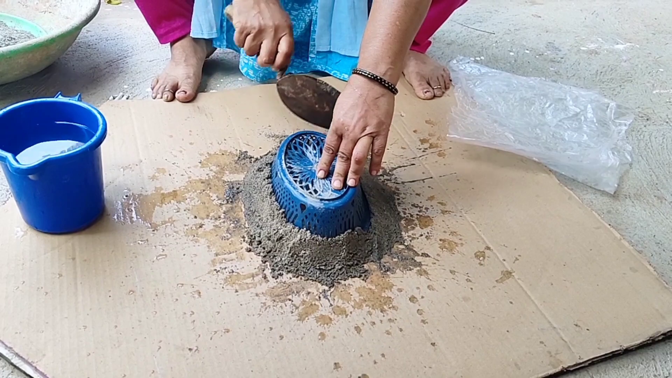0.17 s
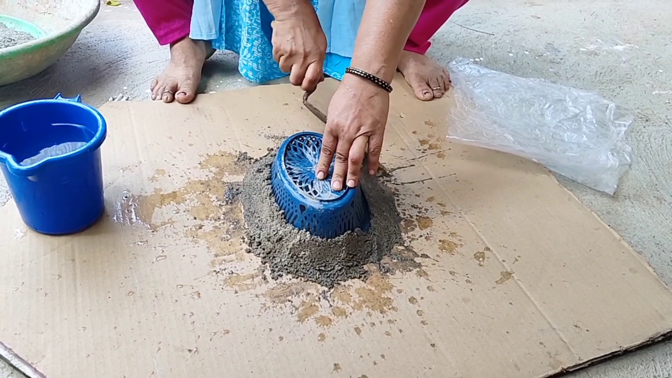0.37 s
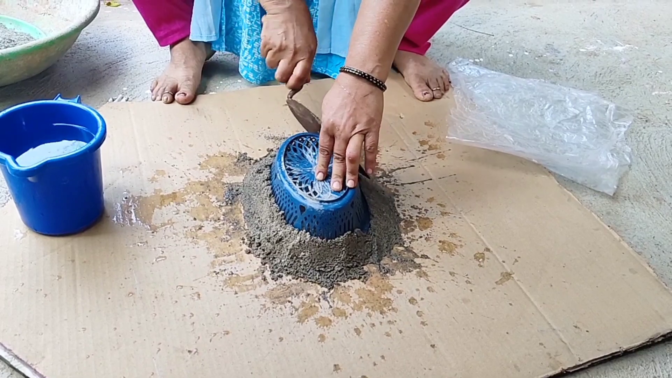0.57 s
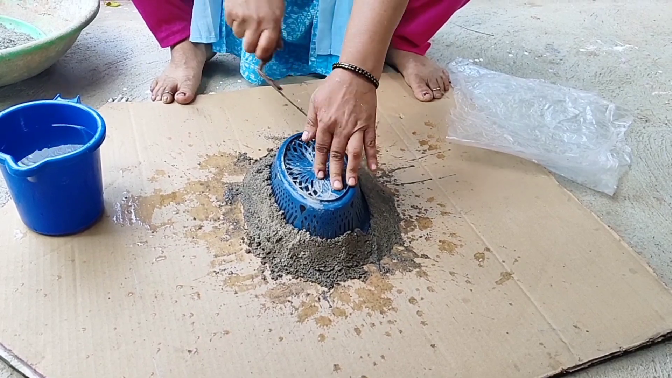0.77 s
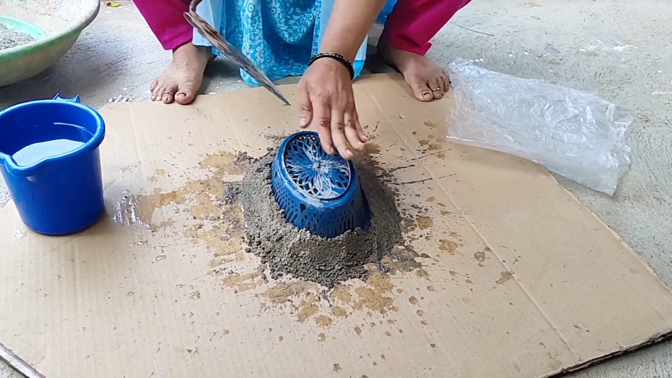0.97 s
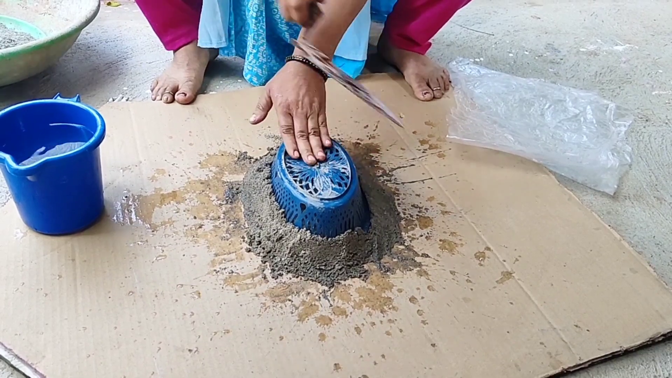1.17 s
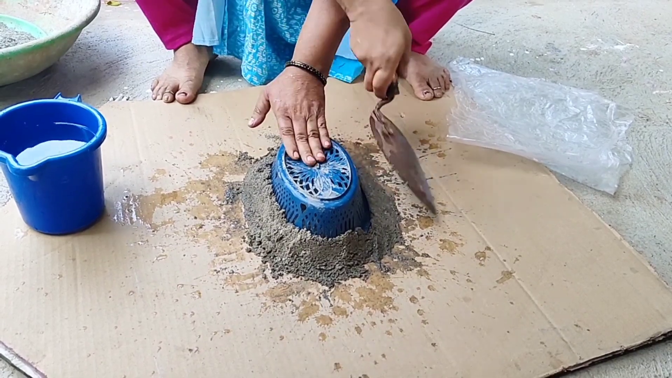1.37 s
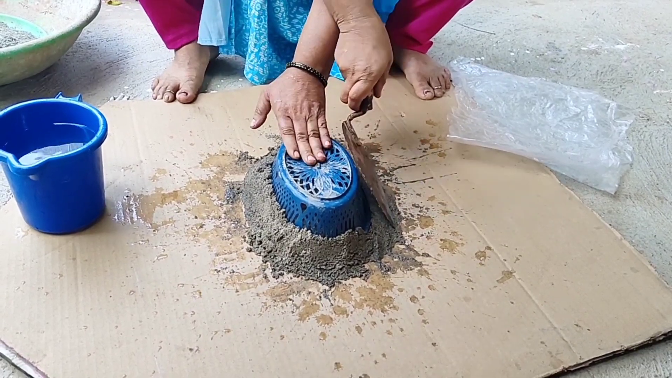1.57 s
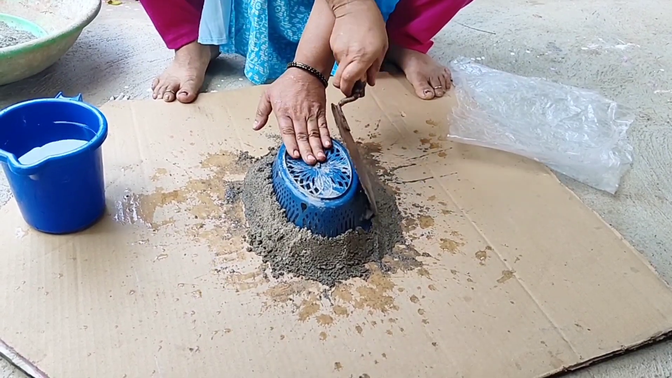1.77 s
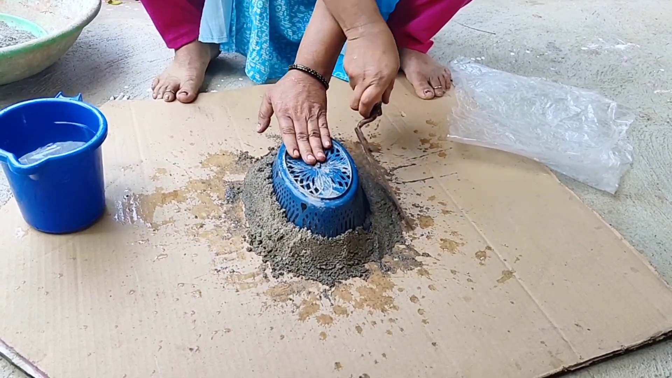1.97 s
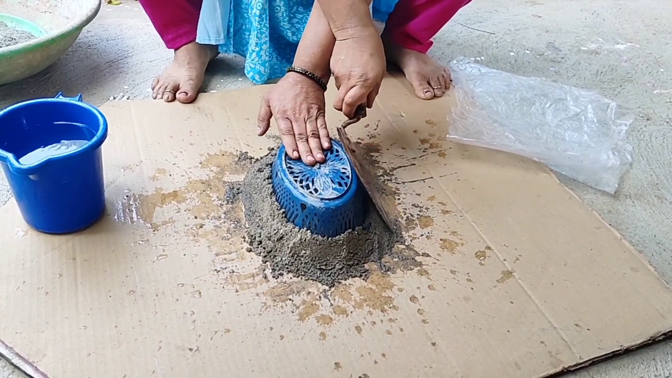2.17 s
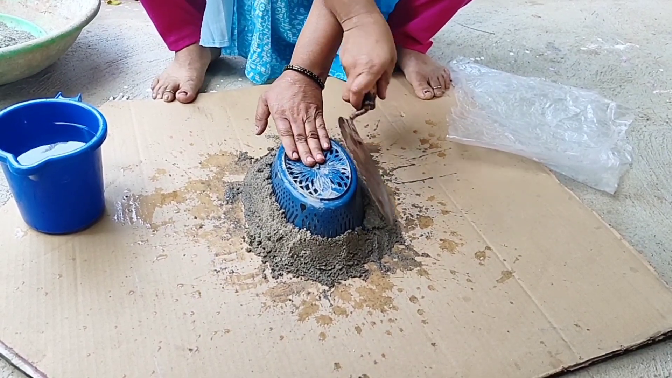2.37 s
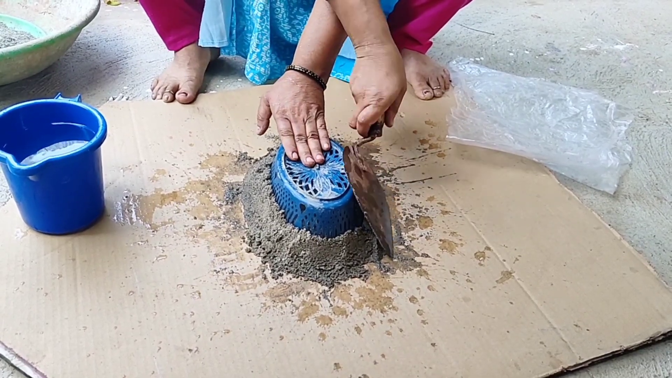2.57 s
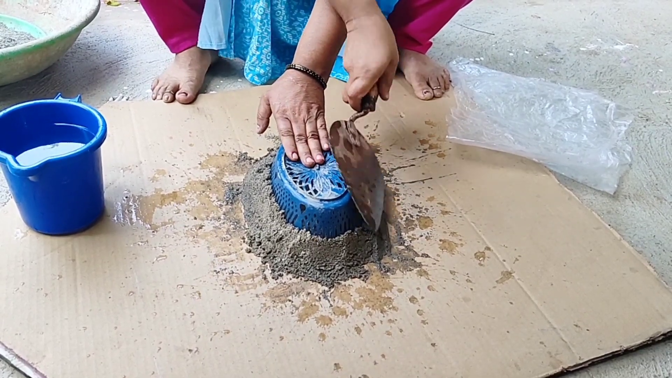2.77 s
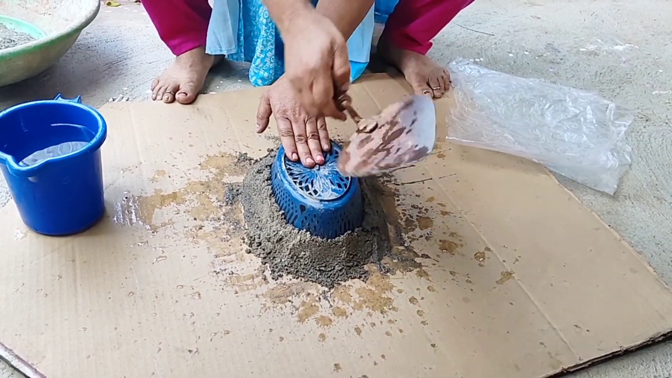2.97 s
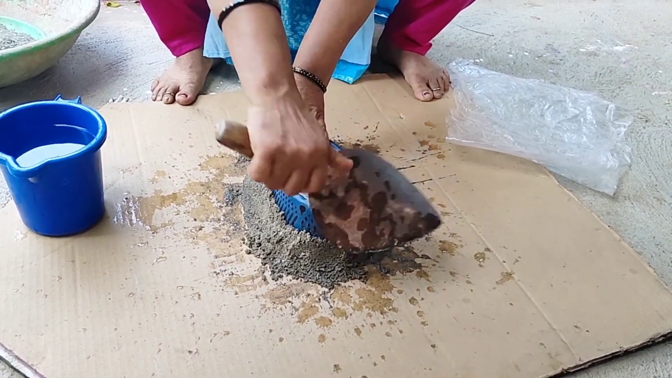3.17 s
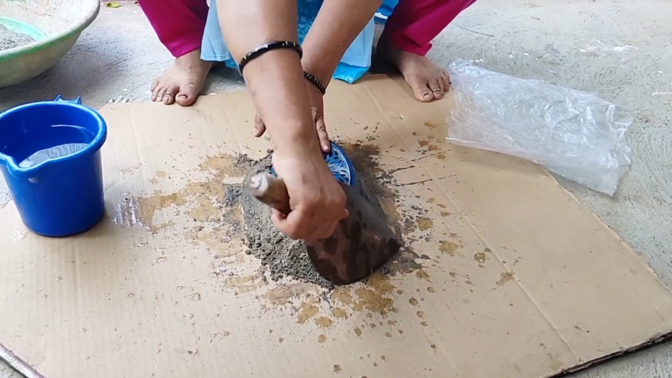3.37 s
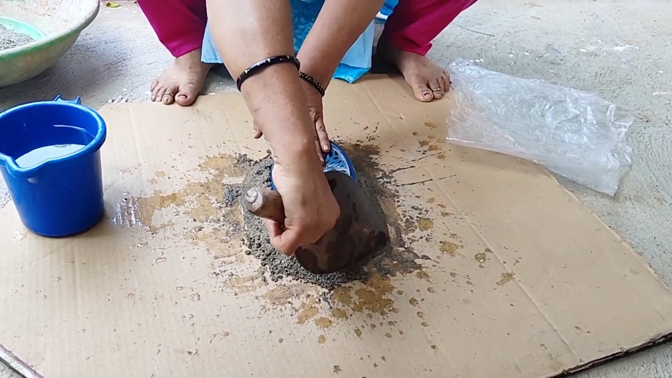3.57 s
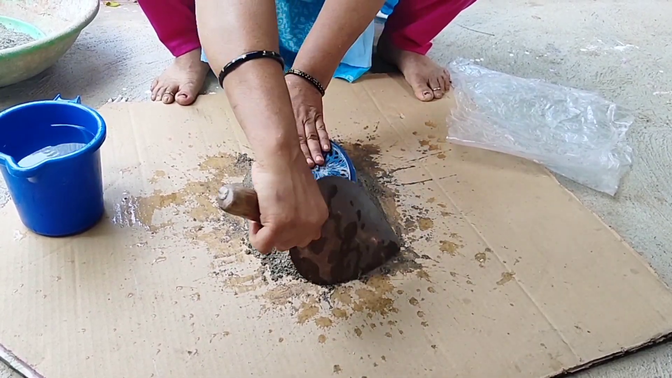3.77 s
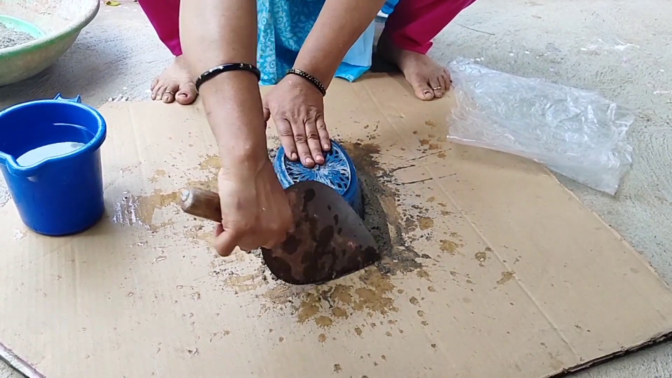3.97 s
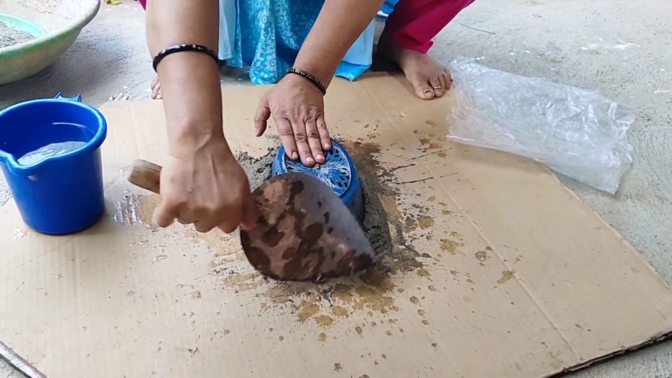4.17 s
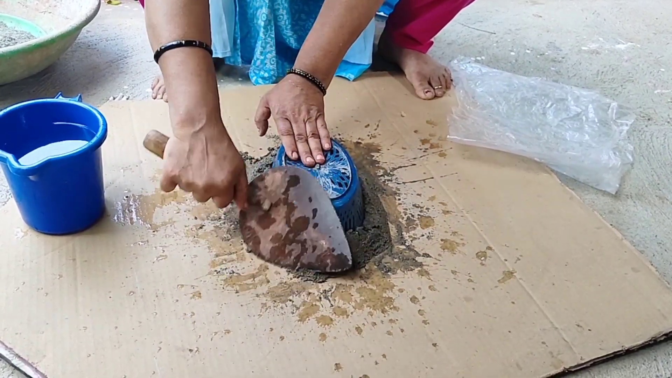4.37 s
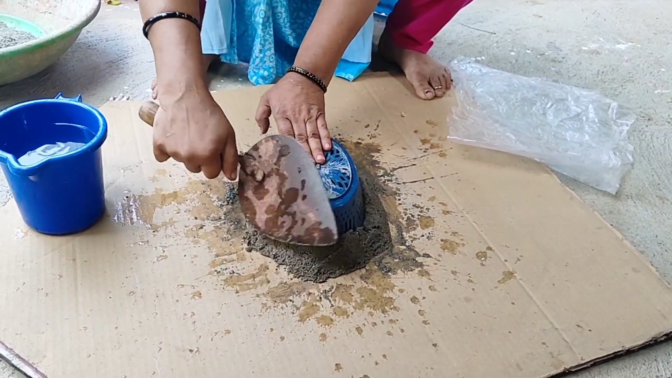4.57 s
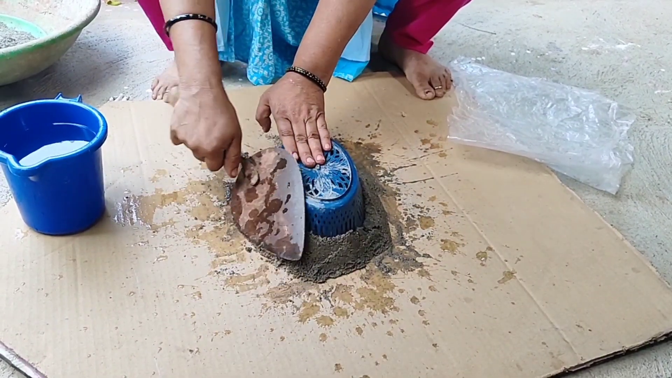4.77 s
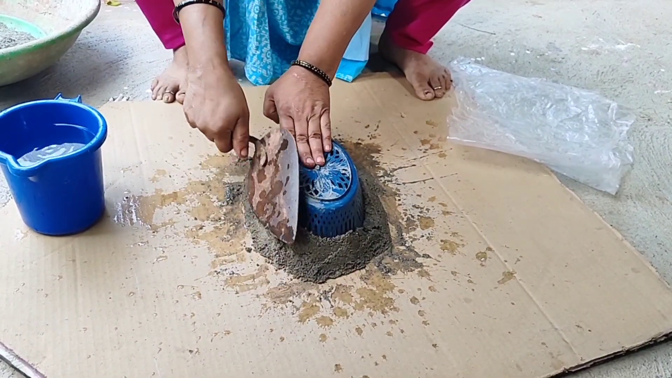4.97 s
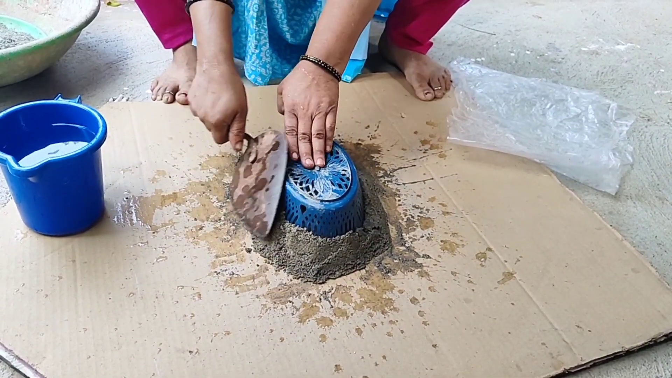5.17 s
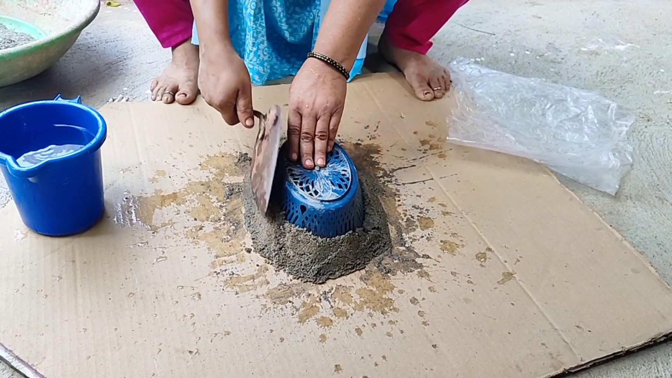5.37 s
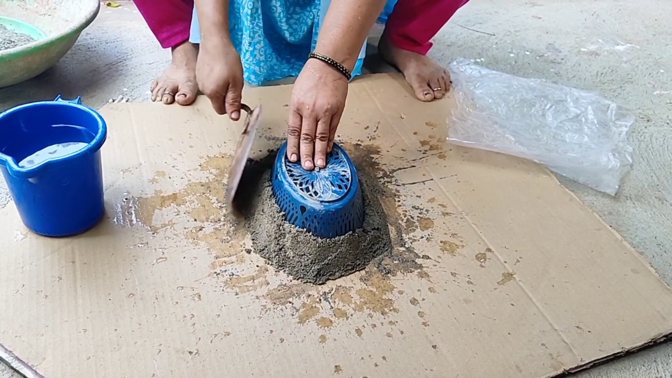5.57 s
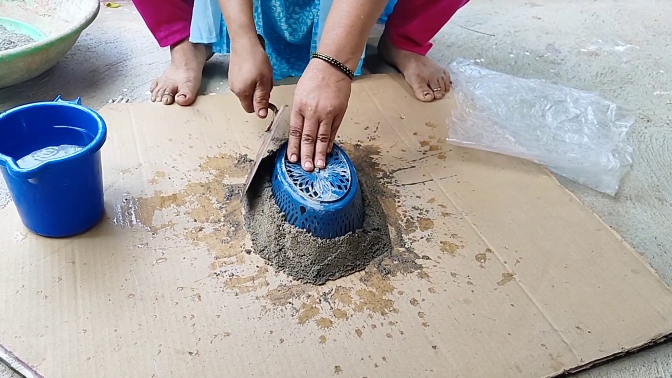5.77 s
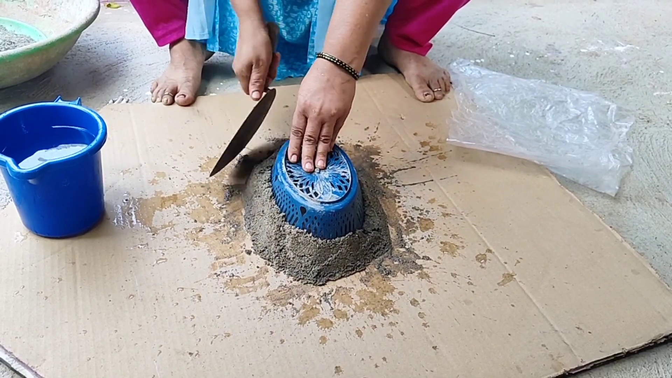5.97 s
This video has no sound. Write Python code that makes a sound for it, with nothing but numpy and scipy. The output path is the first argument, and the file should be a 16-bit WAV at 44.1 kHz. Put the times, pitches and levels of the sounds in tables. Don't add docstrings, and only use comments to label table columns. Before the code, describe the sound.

A quiet outdoor yard, heard about a metre from the work, with low distant traffic rumble swelling gently and a thin airy hum throughout. A steel trowel starts with a very soft gritty drag, then a fuller hollow press at 0.4 seconds fades into a scrape and tiny ping by 0.65. Small ticks and brushes fall near 0.9, 1.2 and 1.3. A short stroke lands at 1.6, a knocking crunch at 2.0, and a strong, dense crunch at 2.55, each followed by a lighter drag. A lull near 3.1 holds only a faint brush and tick. Strokes resume at 3.5, with a heavy gritty knock at 3.9 and a strong double press at 4.35 to 4.45. Shorter hollow, sandy pats follow at 4.8, 5.2 and 5.65, with faint steel pings as the blade lifts. Reflections are brief; the treble is soft.

```python
import sys
import numpy as np
from scipy import signal
from scipy.fft import rfft, irfft, next_fast_len
from scipy.io import wavfile
from scipy.ndimage import uniform_filter1d

SR = 44100
rng = np.random.default_rng(int(sys.argv[2]) if len(sys.argv) > 2 else 0)


def boost(x):
    u = np.asarray(x, float) / 20
    return 10 ** u


def wav_out(sig):
    wavfile.write(sys.argv[1], SR, np.round(np.clip(np.atleast_2d(sig).T, -1, 1) * 32767).astype(np.int16))


N = 265790
T = np.arange(N) / SR
HZ = np.fft.rfftfreq(next_fast_len(N + 8192), 1 / SR)
STEP = 16
TOP_HZ = 15750

# (frequency [Hz], density [dB per Hz])
RUMBLE_SPECTRUM = [(35, -35), (60, -10), (92, -8.5), (129, -13.5), (162, -16), (220, -19), (264, -15.5),
                   (316, -16), (520, -40), (680, -55), (1140, -120)]
HUM_SPECTRUM = [(420, -19), (480, -10.5), (563, -17), (700, -12), (910, -8.5), (1450, 0.5), (1650, -3),
                (2500, -9.5), (3000, -5), (3800, -4.5), (4500, -8.5), (5000, -27.5), (6300, -35),
                (6900, -46)]
# (time [s], level above mean [dB])
SURGES = [
    (.45, 7),
    (.95, 6.5),
    (1.29, 5),
    (1.78, 4.5),
    (3.3, 3),
    (4.8, 3),
    (5.55, 5),
]
RUMBLE_DB, DEEP_DB, SURGE_S = -64.5, -64, 0.082
HUM_DB, HUM_LOW_DB, HUM_HIGH_DB = -64, 0.5, -4
BREEZE_S, BREEZE_DB, BREEZE_LENGTH_S = 3.21, 6, 0.12

# (time [s], mould hollow [dB], board [dB], grit [dB], fine sand [dB])
STROKES = [(0., -9, -15, -0.5, -12), (.41, 7.5, -5.5, -1, -14), (1.57, 1, -25, -2, -10),
           (2.01, 0.5, -11.5, 0.5, -10), (2.54, -5, -25.5, -3, -12.5), (3.47, -5.5, -23, 2, -9.5),
           (3.92, -2.5, -1.5, 5.5, -4.5), (4.34, -5, -8, -4.5, -14), (4.78, 3.5, -11, -1, -9),
           (5.19, 6.5, -3.5, 2.5, -7), (5.64, 2, -5.5, 1, -6.5)]
FLEX_DB = [1, 3, 7, 9.5, -8, 15, 2.5, -11, 4, 2.5, 6]
# (centre [Hz], level [dB])
PACKED = [(880, 5), (690, 9), (694, -1), (730, 8.5), (1300, 1.5), (1000, 0.5), (940, 6), (880, 1),
          (846, -9), (915, 3), (836, -9)]
PACKED_RATIO = 1.243
# (time [s], pressure [dB], attack [s], hold [s], easing [dB/s])
PRESSES = [(0, -56, 0.00067, 0.035, 280), (0.411, -32.5, 0.024, 0.033, 233),
           (1.568, -42, 0.001, 0.0063, 203), (1.686, -57, 0.022, 0.012, 250),
           (2.02, -38, 0.021, 0.051, 141), (2.24, -59, 0.022, 0.018, 178),
           (2.548, -28.5, 0.018, 0.0045, 313), (2.608, -39, 0.034, 0.017, 200),
           (2.799, -56, 0.026, 0.0056, 394), (3.475, -45, 0.0052, 0.022, 190),
           (3.56, -52.5, 0.015, 0.095, 500), (3.924, -39, 0.002, 0.01, 134),
           (3.975, -63, 0.015, 0.0047, 216), (4.345, -34.5, 0.005, 0.053, 201),
           (4.388, -34, 0.034, .012, 326), (4.455, -54, 0.0089, 0.016, 197),
           (4.789, -43.5, .002, 0.018, 165), (4.844, -47, 0.013, .01, 253),
           (5.197, -45.5, .003, 0.051, 200), (5.23, -43, 0.022, 0.012, 240),
           (5.643, -43.5, 0.0041, 0.034, 201), (5.812, -54.5, 0.032, .005, 404)]
# (time of fastest slide [s], grit [dB], swell [s], hold [s], blade ring [dB re grit])
DRAGS = [(0.122, -56, 0.16, 0.024, -17), (0.637, -55, 0.19, 0.025, -25), (1.763, -52, 0.14, 0.042, -8),
         (2.286, -54, 0.1, .04, -20), (2.741, -54.5, 0.24, .03, -18), (3.64, -48, 0.11, 0.045, -24),
         (4.086, -80, .12, 0.022, -24), (4.53, -48.5, 0.27, 0.017, -29), (4.984, -57.5, 0.29, 0.033, -8),
         (5.394, -51.5, 0.1, .025, -20), (5.862, -55, 0.07, 0.014, -1)]
# (time [s], grit [dB], fading [dB/s])
BRUSHES = [
    (0.919, -61.5, 450),
    (1.195, -64.5, 300),
    (1.321, -62.5, 350),
    (3.058, -65.5, 300),
]
# (time [s], peak [dB], treble share [dB], bass share [dB])
KNOCKS = [(0.422, -33, -7, -28), (1.574, -29.5, -38, -14), (1.713, -38, -11, -20), (1.789, -32, -2.5, -22),
          (4.806, -25, -10, -36), (2.019, -20.5, -24, -18), (2.042, -22.5, -10, -30),
          (2.058, -15.5, -7, -33), (2.553, -13, -17, -46), (2.562, -18, -5, -39), (2.659, -50, -5, -26),
          (3.489, -31.5, 1.5, -36), (3.585, -33.5, -10, -30), (3.925, -14.5, -11, -10),
          (4.001, -23, -1.5, -8), (4.346, -15.5, -11.5, -5), (4.375, -29, -7, -25),
          (4.431, -13.5, -9.5, -38), (4.79, -12.5, -11.5, -47), (4.864, -27.5, -7, -37),
          (5.2, -20.5, -9.5, -23), (5.27, -24.5, 3, -24), (5.651, -26.5, 2.5, -30), (5.709, -42, 8.5, -28)]
# (time [s], peak [dB])
PINGS = [
    (0.6294, -45),
    (1.7863, -42),
    (2.3094, -54),
    (2.8294, -50.5),
    (4.9894, -49),
    (5.0294, -46.5),
    (5.4094, -41.5),
    (5.4394, -44),
    (5.8406, -63),
    (5.8794, -50.5),
]
# (time [s], peak [dB], centre [Hz], bright edge [dB])
TICKS = [
    (0.365, -57, 1520, -4),
    (0.925, -37, 3850, -19),
    (0.938, -47, 1400, -22),
    (1.203, -44, 3330, -14.5),
    (1.324, -33.5, 1300, -22),
    (1.349, -57, 1280, -36),
    (3.06, -40, 4230, -18),
    (3.07, -42, 470, -40),
]

# (frequency [Hz], level [dB], T60 [s])
BOARD_MODES = [(186, -11.5, 0.063), (302.5, 5, 0.039)]
MOULD_MODES = [(526, -6.5, 0.1), (629.7, 6, 0.072), (734, -3.5, 0.071), (883, -4, 0.047)]
HEAP_MODES = [(807, 2.5, 0.036), (923, 0.5, 0.035), (1096, -4.5, 0.024), (1102, -3.5, 0.1),
              (1320, -6.5, 0.0073), (1434, -5.5, 0.024)]
BLADE_MODES = [(1572, -5, .25), (1785, -3, .25), (2200, -1, .22), (2400, -8, .2), (2950, -4, .2),
               (3230, -8, .15), (3480, -5, .2), (3660, 0, .3), (3920, -6, .18), (4290, -8, .15),
               (4800, -9, .15), (5500, -5, .2)]

# (frequency [Hz], gain [dB])
LEFT_PORT = [(500, -1), (1800, 2.5), (2500, -0.5), (3300, 1), (3800, 1), (4600, -7), (6300, -9.5),
             (7300, -15), (8300, -11), (10100, -12.5), (10600, -20.5), (12700, -25.5), (14200, -17),
             (15400, -13)]
RIGHT_PORT = [(500, -1), (1400, 5), (1600, 1.5), (2700, 2), (3000, 7.5), (4550, 6.5), (5050, -5),
              (6200, -6.5), (7200, -23), (9000, -30.5), (11000, -15.5), (13000, -23.5), (15000, -42),
              (15900, -43)]

TOUCH_CURVE, SWELL_CURVE = 2.3, 2.1
GRIT_EASE, FINE_EASE, BOARD_EASE = 0.89, 1, 1
PRESS_RING_DB, PRESS_RING_EASE = -14, 1.3
DRAG_LOAD_DB, DRAG_HOLLOW_DB, DRAG_FINE_DB = -9, -26, -7.5
DRAG_OFF_DB_S, FINE_OFF_DB_S = 312, 380
LIFT_DB_S = 247
BRUSH_ATTACK_S, BRUSH_LOAD_DB, BRUSH_FINE_DB, BRUSH_RING_DB = 0.0027, -2, -18, -17
GROUND_T60_S, GROUND_DB = 0.025, 5
YARD_T60_S, YARD_DB = 0.2, 0


def unit(x):
    return x / np.sqrt(np.mean(x ** 2))


def band(x, lo_hz, hi_hz, order=2):
    edges_hz = [lo_hz, min(hi_hz, 0.48 * SR)]
    return signal.sosfilt(signal.butter(order, edges_hz, "bandpass", fs=SR, output="sos"), x)


def colour(x, points):
    hz, db = np.transpose(points)
    gain = boost(np.interp(np.log(HZ + 1), np.log(hz), db))
    return irfft(rfft(x, 2 * len(HZ) - 2) * gain)[..., :N]


def walk(rate_hz):
    hold = int(SR / rate_hz)
    levels = np.repeat(rng.standard_normal(N // hold + 1), hold)
    return 1.73 * uniform_filter1d(uniform_filter1d(levels, hold), hold)[:N]


def rumble():
    mid, side = rng.standard_normal((2, N))
    opposed = side * np.array([[1], [-1]])
    low = unit(colour(mid + 0.31 * opposed, RUMBLE_SPECTRUM)) * boost(RUMBLE_DB + 1.27 * walk(4.44))
    surge_db = sum(db * np.exp(-((T - s) / SURGE_S) ** 2) for s, db in SURGES)
    deep = unit(band(mid + 0.033 * opposed, 16.3, 62)) * boost(DEEP_DB + surge_db)
    return low + deep


def far_hum():
    hum = unit(colour(rng.standard_normal((2, N)), HUM_SPECTRUM))
    high_db = HUM_HIGH_DB + BREEZE_DB * np.exp(-((T - BREEZE_S) / BREEZE_LENGTH_S) ** 2)
    low_db = HUM_LOW_DB + 1.45 * walk(7.7) + np.array([[-3], [4]])
    under = band(hum, 300, 1500, order=3) * boost(low_db)
    over = band(hum, 2600, 10000, order=3) * boost(high_db + 1.3 * walk(10) + np.array([[-2], [1]]))
    air = band(rng.standard_normal((2, N)), 5000, 17000, order=3)
    top = np.array([colour(air[0], LEFT_PORT), colour(air[1], RIGHT_PORT)]) * boost(high_db - 5)
    return boost(HUM_DB) * (under + over + top)


def contact(s, db, attack_s, hold_s, off_db_s, curve):
    t = T[::STEP] - s
    rise = np.clip(t / attack_s, 0, 1) ** curve
    fall_db = (t - attack_s - hold_s).clip(0, 1) * off_db_s
    return rise * boost(2 * (db - fall_db))


def hand():
    t = T[::STEP]
    power = np.zeros((7, len(t)))
    lands = np.array(STROKES)
    leaves_s = [s + hold_s for s, _, _, hold_s, _ in DRAGS]

    for s, db, attack_s, hold_s, ease_db_s in PRESSES:
        k = np.sum(lands[:, 0] <= s + 0.003) - 1
        _, hollow_db, board_db, grit_db, fine_db = lands[k]
        lift_s = max(leaves_s[k], s + attack_s + hold_s)
        lift = boost(-2 * LIFT_DB_S * (t - lift_s).clip(0, 1))
        shares = [(0, 1), (hollow_db, 1),
                  (board_db + FLEX_DB[k] / 2, BOARD_EASE), (board_db - FLEX_DB[k] / 2, BOARD_EASE),
                  (grit_db, GRIT_EASE), (fine_db, FINE_EASE), (PRESS_RING_DB, PRESS_RING_EASE)]
        for layer, (share_db, follow) in enumerate(shares):
            touch = contact(s, db + share_db, attack_s, hold_s, ease_db_s * follow, TOUCH_CURVE)
            power[layer] += lift * touch

    drag_db = [DRAG_LOAD_DB, DRAG_HOLLOW_DB, 0]
    for (s, db, swell_s, hold_s, ring_db), lands_s in zip(DRAGS, lands[:, 0]):
        down = t >= lands_s
        slide = down * contact(s - swell_s, db, swell_s, hold_s, DRAG_OFF_DB_S, SWELL_CURVE)
        power[[0, 1, 4, 6]] += boost(2 * np.array(drag_db + [ring_db]))[:, None] * slide
        fine = contact(s - swell_s, db + DRAG_FINE_DB, swell_s, hold_s, FINE_OFF_DB_S, SWELL_CURVE)
        power[5] += down * fine

    brush_db = np.array([[BRUSH_LOAD_DB], [0], [BRUSH_FINE_DB], [BRUSH_RING_DB]])
    for s, db, fade_db_s in BRUSHES:
        brush = contact(s, db, BRUSH_ATTACK_S, 0, fade_db_s, TOUCH_CURVE)
        power[[0, 4, 5, 6]] += boost(2 * brush_db) * brush
    return [np.interp(T, t, drive) for drive in np.sqrt(power)]


def crunch(rate_hz, spread_db, slip_db):
    signs = (rng.random(N) < rate_hz / SR) * rng.choice([-1, 1], N)
    grains = signs * boost(spread_db * np.minimum(rng.exponential(size=N), 4))
    return unit(grains * boost(slip_db * walk(90)))


def blows(times_s, gains, push_s, firm=0):
    out, n = np.zeros(N), np.arange(400)
    bursts = (firm + rng.standard_normal((len(times_s), 400))) * np.exp(-n / (push_s * SR))
    for s, gain, burst in zip(times_s, gains, bursts):
        out[int(s * SR) + n] += gain * burst / np.sqrt(np.sum(burst ** 2))
    return out


def ring(force, modes):
    out = 0
    for k, (hz, db, t60_s) in enumerate(modes):
        r = np.exp(-np.log(1000) / (t60_s * SR))
        w = 2 * np.pi * hz / SR
        gain = (-1) ** k * boost(db) * np.sin(w) * 2 * np.sqrt(1 - r)
        out = out + signal.lfilter([gain], [1, -2 * r * np.cos(w), r * r], force)
    return out / np.sqrt(np.sum(boost(np.array(modes)[:, 1]) ** 2))


def packed(push):
    edges = (np.array([row[0] for row in STROKES] + [N / SR]) * SR).astype(int)
    parts = []
    for a, b, (hz, db) in zip(edges, edges[1:], PACKED):
        parts.append(boost(db) * band(push[a:b], hz / PACKED_RATIO, hz * PACKED_RATIO))
    return np.concatenate(parts + [np.zeros(N - edges[-1])])


def heap(push):
    return boost(-2.5) * ring(push, HEAP_MODES) + boost(7) * band(push, 549, 2000, order=3) + packed(push)


def board(wide_force, tight_force):
    wide = boost(-13.5) * ring(wide_force, BOARD_MODES[:1])
    tight = boost(-8) * ring(tight_force, BOARD_MODES[1:])
    return band(wide + tight, 148, 960)


def trowel():
    press, hollow, wide, tight, grit, fine, steel = hand()
    s, peak_db, treble_db, bass_db = np.transpose(KNOCKS)
    ping_s, ping_db = np.transpose(PINGS)
    coarse, sand = crunch(1500, 2.5, 1.5), crunch(4500, 3.3, 1.56)

    knock = blows(s, boost(peak_db + 3), 0.00016, firm=3)
    scratch_hit = blows(s, boost(peak_db + treble_db + 10.5), 0.00048)
    bump = blows(s, boost(peak_db + bass_db - 5.5), 0.0007, firm=2.5)
    fine_hit = blows(s, boost(peak_db + treble_db + 2), 0.00053)
    ping = blows(ping_s, boost(ping_db + 20), 0.0021)

    scratch = grit * (0.5 * coarse + 1.082 * sand) + scratch_hit
    rasp = boost(7.5) * band(scratch, 1690, 8390) + boost(-18) * ring(scratch, BLADE_MODES)
    hiss = boost(20) * band(fine * sand + fine_hit, 5800, 19500)
    scrape = heap(press * coarse + knock) + rasp + hiss

    mould = boost(-6) * ring(hollow * coarse + 0.3 * knock, MOULD_MODES)
    blade = ring(steel * sand + ping, BLADE_MODES)
    return scrape, mould + board(wide * coarse + bump, tight * coarse + bump) + blade


def even(echo):
    spectrum = rfft(np.pad(echo, ((0, 0), (256, 0))))
    power = uniform_filter1d(np.abs(spectrum) ** 2, size=50)
    return irfft(spectrum / np.sqrt(power))


def yard(x, steady):
    t = T[:SR // 4]
    ground = boost(GROUND_DB) * np.exp(-t * np.log(1000) / GROUND_T60_S) / np.sqrt(GROUND_T60_S)
    walls = boost(YARD_DB) * np.exp(-t * np.log(1000) / YARD_T60_S) / np.sqrt(YARD_T60_S)
    walls = walls * np.clip(t / 0.018, 0, 1)
    decay = (ground + walls) * np.sqrt(2 * np.log(1000) / SR)

    share = boost(8 * np.array([walk(70) for _ in range(6)]))
    share /= np.sqrt(np.sum(share ** 2, axis=0))
    lowpass = signal.butter(2, 1400, fs=SR, output="sos")
    out = 0
    for place, part in enumerate(share * x):
        noise = rng.standard_normal((3, len(t)))
        alike = signal.sosfilt(lowpass, noise[0] - noise[1:])
        echo = band(noise[1:] + alike, 263, 15700) * decay
        echo[0, 0] += 1
        echo[1, 4 + place] += 1
        source = (part + 0.08 * steady)[None]
        out = out + signal.oaconvolve(source, even(echo), axes=1)[:, 256:N + 256]
    return out * boost(-0.46) + np.array([steady, np.roll(steady, 7)])


def ticks():
    out = 0
    for s, db, hz, top_db in TICKS:
        tap = blows([s], [boost(db + 20.5)], 0.0019)
        ratio = 1.15 if hz > 2500 or hz < 600 else 1.55
        out = out + band(tap, hz / ratio, hz * ratio) + boost(top_db + 7.5) * band(tap, 7100, 9800)
    return out


def scene():
    scrape, bodies = trowel()
    taps = ticks()
    near = yard(scrape + 0.6 * taps, bodies + 0.62 * taps)
    tool = np.array([colour(near[0], LEFT_PORT), colour(near[1], RIGHT_PORT)])
    return tool + rumble() + far_hum()


def roll_off(x):
    return signal.sosfilt(signal.butter(12, 16990, fs=SR, output="sos"), x)


def record(dry):
    cut = signal.sosfilt(signal.ellip(8, 0.2, 70, TOP_HZ, fs=SR, output="sos"), dry)
    return roll_off(cut)


dry = scene()
out = record(dry)
wav_out(out)
```